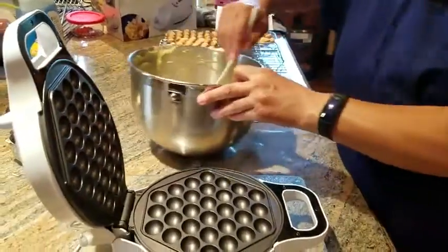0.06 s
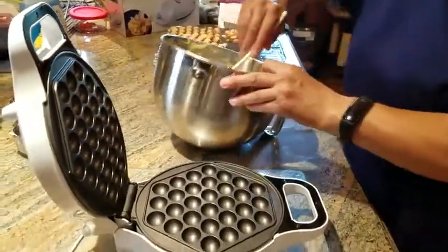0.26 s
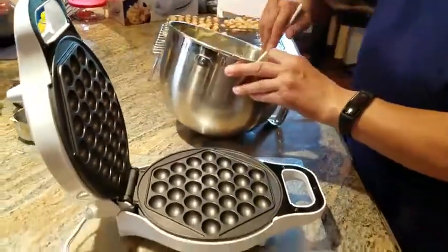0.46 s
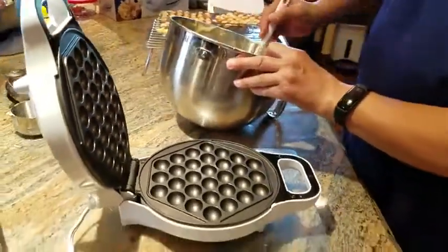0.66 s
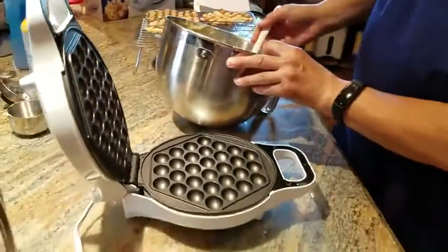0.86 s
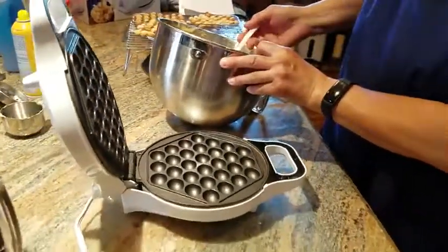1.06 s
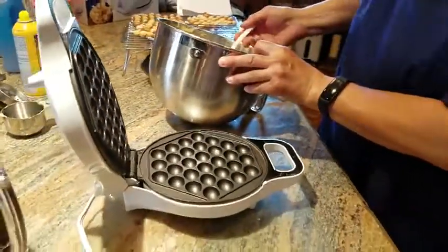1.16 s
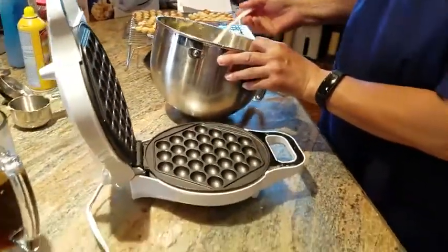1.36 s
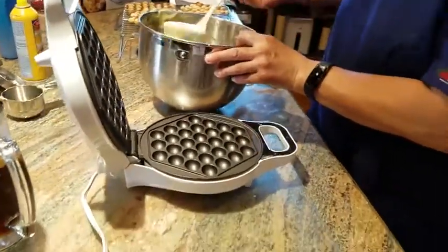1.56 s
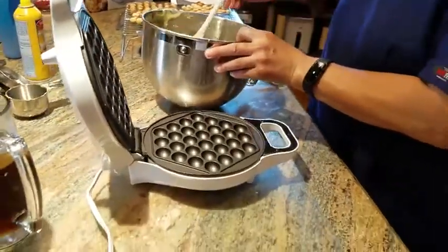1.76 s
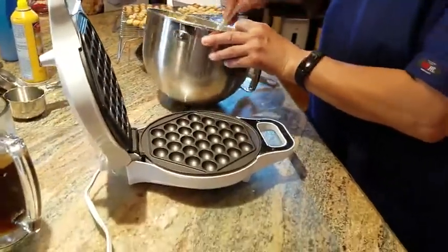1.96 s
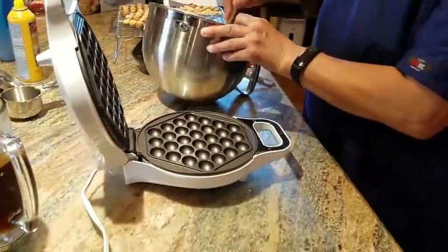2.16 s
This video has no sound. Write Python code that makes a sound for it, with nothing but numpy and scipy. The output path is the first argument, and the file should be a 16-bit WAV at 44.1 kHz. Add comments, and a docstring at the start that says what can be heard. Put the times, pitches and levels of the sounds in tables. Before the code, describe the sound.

A spatula knocks against a steel mixing bowl, first in a quick cluster of ringing clanks, then a few more times. Wet batter smears and smacks softly between the knocks, close by in a small kitchen with a quiet hum.

```python
"""Quiet appliance hum and room noise; a spatula smears, squeaks and smacks through batter.
It knocks against the hand-held steel mixing bowl: the base thuds, the wall clanks, the rim rings on.
Some knocks bump the bowl on the stone counter. A small, live kitchen echoes knocks and batter."""
import sys
import numpy as np
from scipy import signal
from scipy.fft import rfft, irfft
from scipy.io import wavfile

SR = 44100
rng = np.random.default_rng(int(sys.argv[2]) if len(sys.argv) > 2 else 0)


def unload_audio(sound):
    """Save the sound as a 16-bit wav file, at the path given as the first command line argument."""
    columns = np.transpose(np.atleast_2d(sound))
    # keep every value between -1 and 1, then stretch to whole-number steps
    steps = np.round(np.clip(columns, -1, 1) * 32767)
    wavfile.write(sys.argv[1], SR, steps.astype(np.int16))


N = 97020
TIME_S = np.arange(N) / SR
FREQ_HZ = np.maximum(np.fft.rfftfreq(N, 1 / SR), 1)

# room noise spectrum (frequency [Hz], relative density [dB])
AIR_SPECTRUM = [(15, -65), (25, -27), (48, -7.5), (145, -5), (175, 2), (195, -6), (285, -2.5), (439, -10.5),
                (591, -10), (1160, -18.5), (2160, -20.5), (2610, -25), (3620, -31), (16000, -68)]
# appliance tones (frequency [Hz], rms level [dB])
HUM_TONES = [(57, -64), (109, -60.5), (172, -66), (581, -66.5), (694, -70), (780, -75)]
# blade smearing batter (time [s], level [dB])
SMEAR_LEVELS = [(0, -64), (.07, -66), (.13, -64.5), (.21, -60), (.42, -63.5), (.57, -58.5), (.75, -68),
                (.88, -61.5), (1.1, -61), (1.2, -58.5), (1.3, -68.5), (1.6, -68), (1.7, -66), (2.0, -69),
                (2.07, -52), (2.14, -63), (2.2, -57.5)]
# smear spectrum (frequency [Hz], relative density [dB])
SMEAR_SPECTRUM = [(500, -3), (2200, 3.5), (4000, 0.5), (5500, -1), (9500, -1.5), (15000, -1)]
# blade rubbing the wall (mid time [s], level [dB], half length [s], centre [Hz])
SQUEAKS = [(0.091, -54.5, 0.014, 3370), (1.179, -61, 0.044, 3930), (1.281, -60, 0.022, 2280),
           (1.652, -64, .025, 3520), (1.686, -64.5, 0.063, 2220)]
# batter smacks (time [s], crackle [dB], t60 [s], centre [Hz], spread [oct], tick [dB])
BATTER_SMACKS = [(.168, -58, .03, 11000, .6, -54), (0.3688, -42, 0.014, 3850, 0.78, -38),
                 (0.842, -51.5, 0.19, 11000, 0.88, -51), (0.999, -45, 0.04, 3200, 0.46, -53),
                 (1.064, -56, 0.05, 4000, 0.61, -50), (1.778, -43.5, 0.067, 2040, 0.86, -58),
                 (1.782, -49, 0.11, 11400, 0.55, -52), (2.0332, -46.5, 0.048, 3000, 1, -46),
                 (2.040, -44.5, .06, 8200, 0.73, -33), (2.0895, -42, .025, 11100, 0.34, -31)]
# spatula on bowl (time [s], thud [dB], thud centre [Hz], thud spread [oct], clank [dB],
# clank tilt [dB/oct], clink [dB], ring [dB], ring spread [oct], ring swell [s], ring L-R [dB])
SPATULA_KNOCKS = [(.2210, -15, 370, 0.99, -20.5, 2, -23, -28, 1.8, 0.0058, -0.5),
                  (.2415, -23.5, 376, .7, -27, -0.5, -31.5, -30.5, 0.061, 0.0018, 2),
                  (0.2487, -7.5, 266, 0.59, -24, -4.5, -51, -59, 0.28, 0.0099, -16),
                  (.2605, -11.5, 242, 0.37, -24.5, -11, -44, -60, 0.13, .008, -6),
                  (0.3511, -24.5, 290, 0.88, -32.5, 0, -47, -47.5, 1, 0.0053, 19),
                  (0.3716, -17.5, 257, 0.46, -40, 0, -56, -37, 0.035, 0.013, -5),
                  (.425, -41, 280, 0.27, -39, -2, -62, -56, 0.89, 0.0058, -8),
                  (.7910, -18, 418, 0.23, -26.5, -1, -33.5, -24.5, 0.084, 0.039, 7),
                  (0.7982, -18.5, 234, 0.99, -31, -40, -52, -50, 0.61, .005, -13),
                  (.9470, -20.5, 407, 0.41, -30.5, -2, -41, -37.5, 0.17, 0.017, 5.5),
                  (2.0714, -23, 309, 0.47, -39.5, 1, -64, -42.5, 0.37, 0.0052, 0)]
# bowl base, damped by batter and hand (frequency [Hz], level [dB], t60 [s])
BASE_MODES = [(214, -6, 0.19), (246.2, -1.5, 0.087), (372, -4.5, 0.11), (453, -0.5, 0.081),
              (503.5, -4.5, 0.066), (581, -5, 0.066), (724, -25.5, 0.044)]
# brief modes at the contact point (frequency [Hz], level [dB], t60 [s])
CLINK_MODES = [(4052, -2, 0.029), (4390, 0, 0.0087), (4624, -1.5, 0.028), (6680, -8, 0.024),
               (6780, -9, 0.017), (8600, -11, 0.0098), (9700, -13, 0.01), (11600, -18, 0.01),
               (14100, -19, 0.0083)]
# dense, short-lived wall modes (frequency [Hz], relative density [dB])
CLANK_SPECTRUM = [(40, -36), (120, 23), (300, 14.5), (600, 8.5), (850, 7.5), (1150, 8), (1500, -1.5),
                  (1900, 4.5), (2400, 8.5), (2900, -5), (3550, -11.5), (4100, -2), (4700, -18.5),
                  (5300, -14.5), (6100, -22), (6800, -7), (7800, -27.5), (9000, -9.5), (10400, -22.5),
                  (11500, -17.5), (12700, -26), (15000, -23.5)]
# ringing wall and rim (frequency [Hz], level [dB], t60 [s])
RIM_MODES = [(764, -27, 0.17), (839.5, -5.5, 0.6), (989, -3.5, 0.65), (953, -12, 0.33), (1142, 7, 0.053),
             (1428, -6, 0.28), (1832, 4.5, 0.09), (1915, -15, 0.4), (1957, -12, 1), (2178, -2.5, 0.27),
             (2233, -3.5, 0.42), (2270, -17, 0.31), (2580, -11.5, 0.15), (2630, -31, 0.14),
             (3968, -10.5, 0.33), (4145, -13, 0.28), (4690, -13, 0.15)]
# bowl on counter (time [s], peak level [dB])
COUNTER_BUMPS = [(0.25, -30), (0.373, -47), (0.799, -42)]
# kitchen echo spectrum (frequency [Hz], relative density [dB])
ECHO_SPECTRUM = [(30, -30), (80, -2), (250, -6.5), (600, -3), (2000, 3.5), (6000, -0.5), (15000, -1.5)]


def amp(db):
    """Decibels to gain."""
    return 10 ** (np.asarray(db) / 20)


def colour(points):
    """Gain per FFT bin from (frequency [Hz], level [dB]) points."""
    hz, db = np.array(points, float).T
    return amp(np.interp(np.log(FREQ_HZ), np.log(hz), db))


def hump(hz, centre_hz, spread_oct):
    """Bell-shaped weight in log frequency."""
    return 1 / (1 + (np.log2(hz / centre_hz) / spread_oct) ** 2 / 2) ** 2


def fade(t60_s):
    """Exponential decay."""
    return np.exp(-np.log(1000) * TIME_S / t60_s)


def rise(rise_s, power=1):
    """Attack from 0 to 1; power 2 starts softly."""
    return 1 - np.exp(-(TIME_S / rise_s) ** power)


def pan(left_minus_right_db):
    """Left and right gains."""
    return amp(np.array([[0.5], [-0.5]]) * left_minus_right_db)


def add(out, start_s, sound):
    """Mix a sound in at its time."""
    i = int(start_s * SR)
    out[:, i:] += sound[..., :N - i]


def noise(gain, wide_hz=1350, grain=0, side_db=0):
    """Coloured stereo noise, rms 1; near mono below wide_hz, crackly with grain."""
    white = rng.standard_normal((2, N))
    flicker = np.exp(grain * np.repeat(rng.standard_normal(N // 32 + 1), 32)[:N])
    mid, side = rfft(white * flicker)
    width = amp(side_db) * FREQ_HZ / np.hypot(FREQ_HZ, wide_hz)
    spectrum = np.array([mid + width * side, mid - width * side])
    stereo = irfft(spectrum * gain / np.hypot(1, width), N)
    return stereo / stereo.std()


def die_away(sound, t60_s, damping_per_oct):
    """Decay by octave band; t60 holds to 2 kHz, shortens above."""
    octave = np.clip(np.log2(FREQ_HZ / 2000), 0, 3)
    spectrum = rfft(sound)
    bands = [irfft(spectrum * np.maximum(1 - abs(octave - k), 0), N) for k in range(4)]
    return sum(band * fade(t60_s * 2 ** (-k * damping_per_oct)) for k, band in enumerate(bands))


def modes(table):
    """One decaying complex tone per mode."""
    return np.array([amp(db) * fade(t60_s) * np.exp(2j * np.pi * hz * TIME_S) for hz, db, t60_s in table])


def scatter_phases(tones, ear_gap_turns=0.2):
    """Stereo sum of tones at random phases; each leads in one ear."""
    lead = ear_gap_turns * rng.choice([-1, 1], len(tones)) / 2
    turns = rng.random(len(tones)) + np.array([lead, -lead])
    return (np.exp(2j * np.pi * turns) @ tones).imag


def appliance_hum():
    """Steady low tones."""
    return sum(np.sqrt(2) * amp(db) * np.sin(2 * np.pi * (hz * TIME_S + rng.random()))
               for hz, db in HUM_TONES)


def room_air(start_db=-46.62, fall_db_per_s=2):
    """Low room noise, settling slightly."""
    level = amp(start_db - fall_db_per_s * TIME_S)
    return pan(-1) * level * noise(colour(AIR_SPECTRUM), wide_hz=845)


def smear():
    """Blade through batter: fine wet hiss."""
    level_db = np.interp(TIME_S, *np.array(SMEAR_LEVELS).T)
    return amp(level_db) * noise(colour(SMEAR_SPECTRUM), grain=0.14)


def squeaks(spread_oct=0.16):
    """Blade rubs the wall: faint narrow-band swells."""
    out = np.zeros((2, N))
    for mid_s, db, half_s, hz in SQUEAKS:
        swell = np.exp(-((TIME_S - mid_s) / half_s) ** 2)
        out += amp(db) * swell * noise(hump(FREQ_HZ, hz, spread_oct))
    return out


def smacks(rise_s=0.00038, tick_t60_s=0.0053):
    """Wet batter: opening tick, then crackle."""
    out = np.zeros((2, N))
    for start_s, db, t60_s, centre_hz, spread_oct, tick_db in BATTER_SMACKS:
        crackle = noise(hump(FREQ_HZ, centre_hz, spread_oct), grain=0.55)
        envelope = (amp(db) * fade(t60_s) + amp(tick_db) * fade(tick_t60_s)) * rise(rise_s)
        add(out, start_s, crackle * envelope)
    return out


def bowl_knocks(thud_rise_s=0.0015, metal_rise_s=0.00043, low_cut_hz=203):
    """Base thud, wall clank and contact clink; the bowl radiates little bass."""
    out = np.zeros((2, N))
    base = modes(BASE_MODES).imag * rise(thud_rise_s)
    base_hz = np.array(BASE_MODES)[:, 0]
    contact = modes(CLINK_MODES)
    oct_re_1khz = np.log2(np.maximum(FREQ_HZ, 400) / 1000)
    for start_s, thud_db, centre_hz, spread_oct, clank_db, db_per_oct, clink_db, *_ in SPATULA_KNOCKS:
        thud = hump(base_hz, centre_hz, spread_oct) @ base
        wall = noise(colour(CLANK_SPECTRUM) * amp(db_per_oct * oct_re_1khz), side_db=-0.5)
        tail = amp(-9) * die_away(wall, t60_s=0.25, damping_per_oct=0.12)
        clank = wall * fade(t60_s=0.081) + tail
        metal = (amp(clank_db) * clank + amp(clink_db) * scatter_phases(contact)) * rise(metal_rise_s)
        add(out, start_s, pan(-1.5) * metal - amp(thud_db) * thud)
    return signal.sosfilt(signal.butter(3, low_cut_hz, "high", fs=SR, output="sos"), out)


def rim_ring(centre_hz=2228):
    """Each knock tops up the rim modes around centre_hz; they swell and ring on."""
    out = np.zeros((2, N))
    for hz, db, t60_s in RIM_MODES:
        envelope = np.zeros((2, N))
        for start_s, *_, ring_db, spread_oct, swell_s, pan_db in SPATULA_KNOCKS:
            drive = amp(db + ring_db) * hump(hz, centre_hz, spread_oct)
            add(envelope, start_s, drive * pan(pan_db) * fade(t60_s) * rise(swell_s, power=2))
        tone = np.exp(2j * np.pi * hz * TIME_S)
        out += envelope * scatter_phases(tone[None])
    return out


def counter_bumps(hz=91, t60_s=0.11, rise_s=0.014):
    """Bowl foot lands on the counter: soft, low bump."""
    out = np.zeros((2, N))
    bump = np.sin(2 * np.pi * hz * TIME_S) * fade(t60_s) * rise(rise_s, power=2)
    for start_s, db in COUNTER_BUMPS:
        add(out, start_s, amp(db) * bump / abs(bump).max())
    return out


def kitchen(direct, echo_db=-3.5, rise_s=0.002):
    """Direct sound plus diffuse echo off hard counters and cupboards."""
    impulse = die_away(noise(colour(ECHO_SPECTRUM)), t60_s=0.54, damping_per_oct=0.11)
    impulse *= rise(rise_s, power=2)
    impulse /= np.sqrt(np.sum(impulse ** 2) / 2)
    return direct + amp(echo_db) * signal.fftconvolve(direct, impulse, axes=1)[:, :N]


def scene():
    """Batter, knocks and bumps with echo; hum, air and rim without."""
    direct = smear() + squeaks() + smacks() + bowl_knocks() + counter_bumps()
    return appliance_hum() + room_air() + kitchen(direct) + rim_ring()


def record(dry, top_hz=15600):
    """Steep low-pass."""
    return signal.sosfilt(signal.ellip(8, 0.2, 70, top_hz, fs=SR, output="sos"), dry)


dry = scene()
out = record(dry)
unload_audio(out)
```